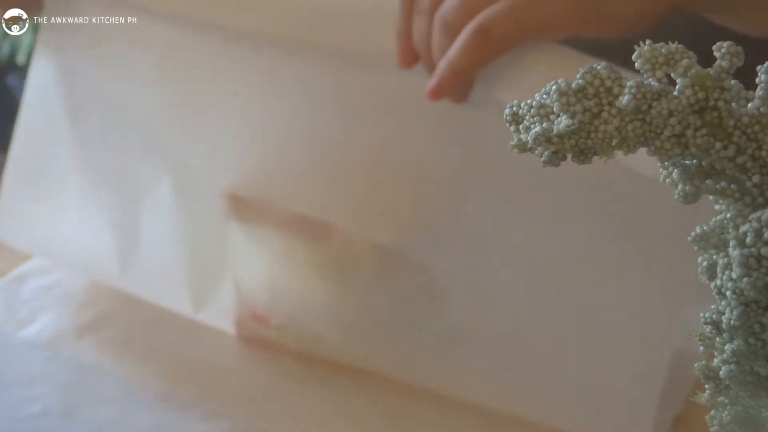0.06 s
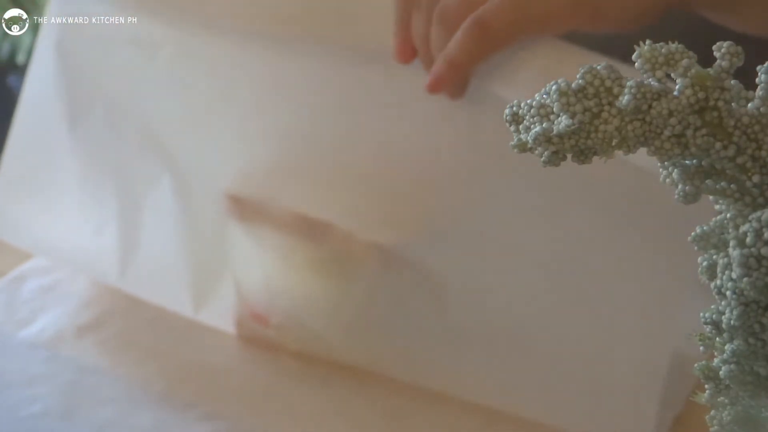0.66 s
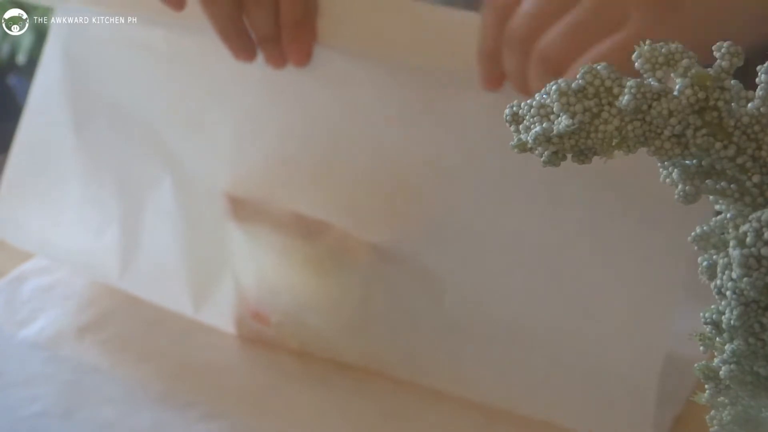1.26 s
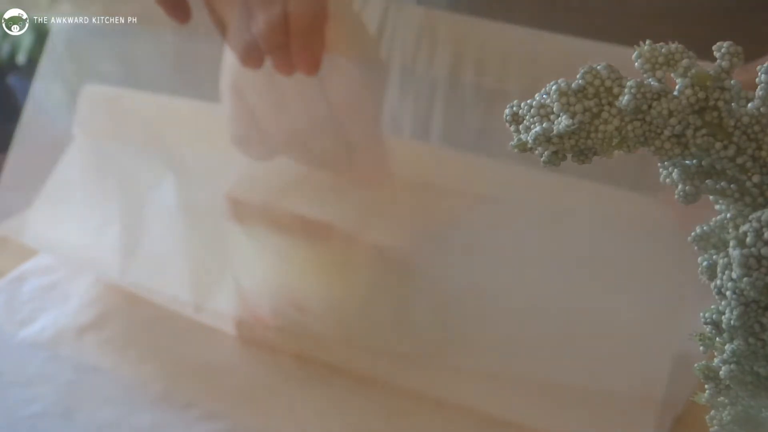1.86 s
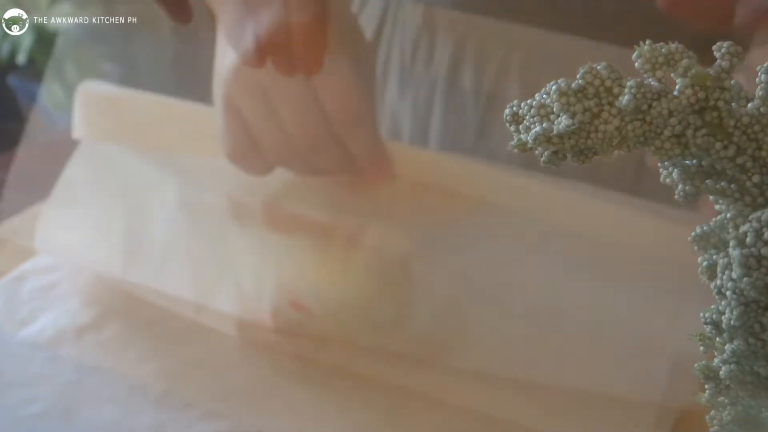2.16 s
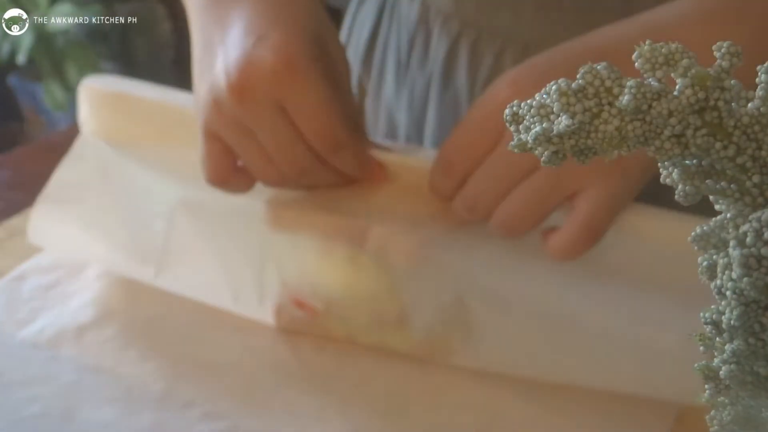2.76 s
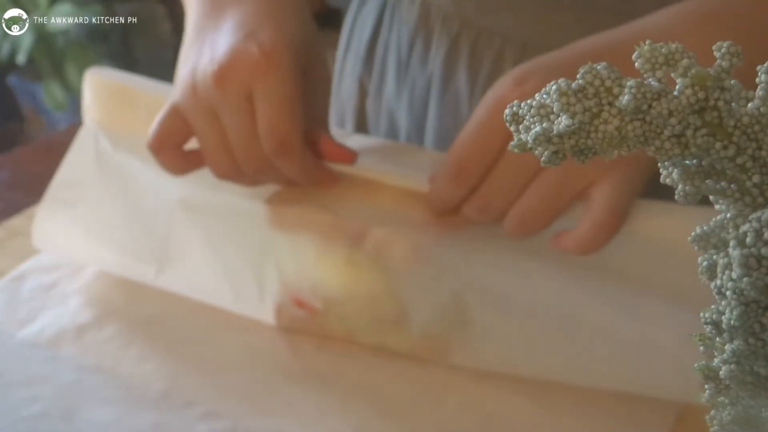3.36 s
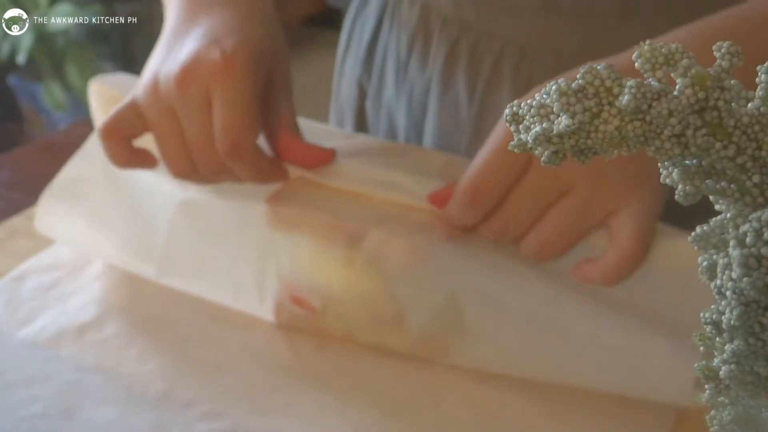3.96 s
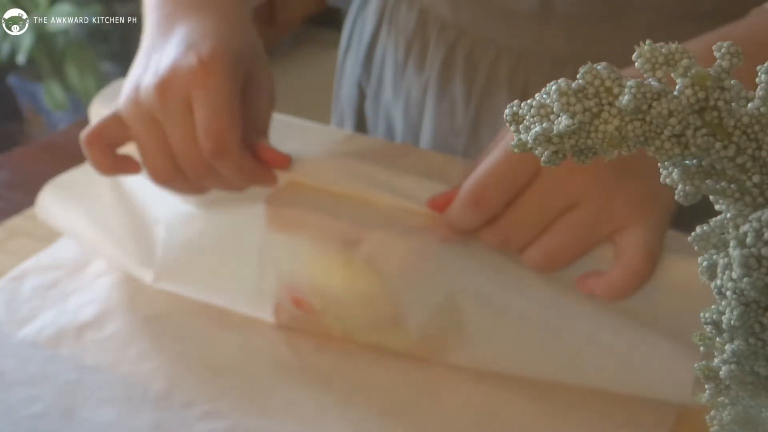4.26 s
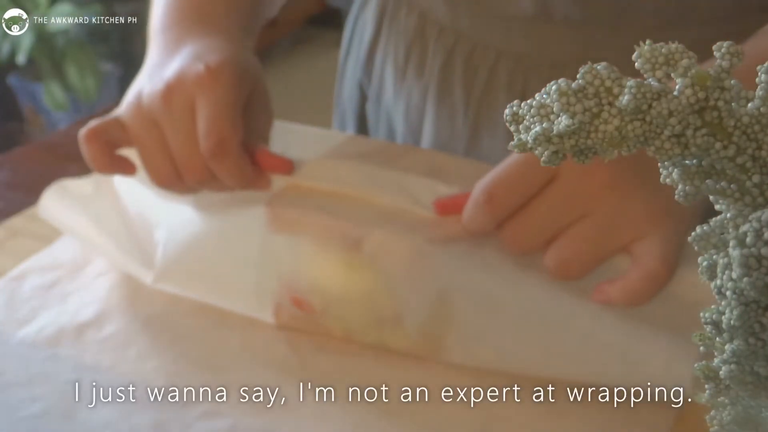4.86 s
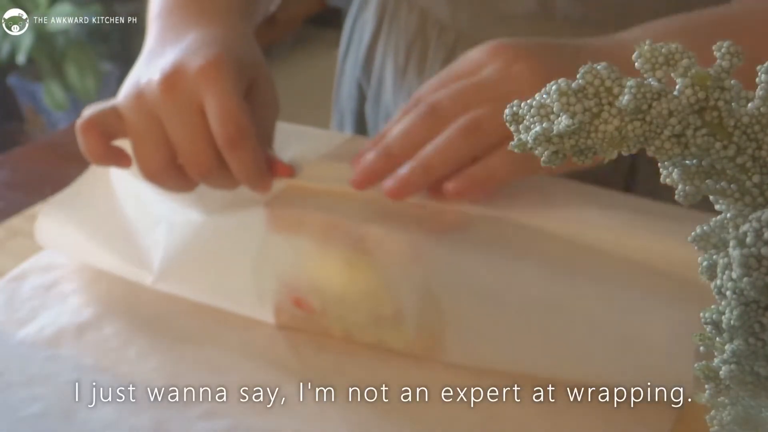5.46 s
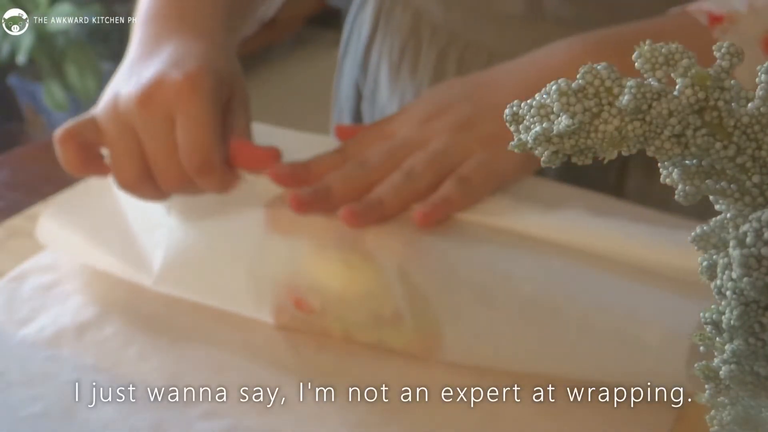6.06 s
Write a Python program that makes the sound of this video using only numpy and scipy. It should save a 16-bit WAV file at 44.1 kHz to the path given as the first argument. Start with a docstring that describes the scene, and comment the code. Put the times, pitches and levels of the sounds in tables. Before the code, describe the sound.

Close, crisp rustling and crackling of baking paper being creased over a parcel of food in short, uneven pushes.

```python
"""Small kitchen, microphone close to the table: thin baking paper is folded over food by hand.
The sheet is lifted and folded: each push of the fingers sets off a rustle of tiny buckles and sliding
paper, and larger facets snap through. After a lull just before 2 s the creasing goes on. Near 4 s the
hardest snaps come as the tucked fold bumps the parcel on the table; lighter touches lead to a last push
and bump at 6 s. Throughout, a hard surface nearby and the room throw the sound back over a faint hiss."""
import sys
import numpy as np
from scipy import signal
from scipy.fft import rfft, irfft
from scipy.io import wavfile
from scipy.ndimage import uniform_filter1d

SR = 44100
rng = np.random.default_rng(int(sys.argv[2]) if len(sys.argv) > 2 else 0)


def waveform_to_disk(signal):
    """Save audio, clipped to [-1, 1], as 16-bit WAV at the path in sys.argv[1]."""
    frames = np.transpose(np.atleast_2d(signal))
    scaled = np.clip(frames, -1, 1) * 32767
    samples = np.round(scaled).astype(np.int16)
    wavfile.write(sys.argv[1], SR, samples)


N = 270333

# facets snapping through:
# (time [s], relative energy [dB], die-away time [ms], tilt [dB/octave], facet pitch [Hz])
FACET_SNAPS = [(0.012, -39, 3.8, -5, 6800), (0.0836, -16, 0.73, 15, 6600), (0.0945, -14.5, 0.37, 9, 8700),
               (0.1251, -14, 1.2, -1, 8500), (0.3346, -25, 1.1, 9, 4720), (0.3912, -28, 1.8, 10, 3900),
               (0.4282, -19.5, 1.3, 3.5, 9400), (0.4472, -24, 2.1, 10, 4020), (0.7412, -59.5, 1, 1, 2930),
               (0.9394, -16.5, 1, 10, 6060), (1.057, -25, 0.6, 4, 7950), (1.0818, -15, 0.85, 15, 4660),
               (1.1537, -15, 2.8, 3, 6550), (1.1722, -14, 2.5, 1, 4870), (1.2091, -14, 4.1, 1, 4010),
               (1.25, -10, 2.2, 0, 8800), (1.2895, -16, 1.4, -2.5, 7350), (1.3386, -18.5, 1, -3.5, 8800),
               (1.367, -15, 0.57, 4, 6740), (1.401, -19, 1.5, 16, 6660), (1.444, -15, 2.5, 3, 2700),
               (1.624, -31, 0.73, 4.5, 4440), (1.625, -33.5, 1.6, 2.5, 1570), (1.6896, -41, 2.7, 2, 2840),
               (1.7581, -39, 1.3, 9, 6400), (1.7931, -41, 3.9, -0.5, 2270), (1.8123, -40, 1.2, 0.5, 2750),
               (2.267, -29, 2, 3.5, 2600), (2.2927, -13.5, 1.1, 2, 3100), (2.3213, -18.5, 1.7, 7, 5000),
               (2.4098, -18.5, 2.9, -6.5, 7650), (2.4105, -21, 4.7, 5, 1600), (2.4545, -12, 1.1, 1, 2300),
               (2.5384, -16.5, 1.5, 9, 3320), (2.5748, -20.5, 0.46, -2, 2750),
               (2.7039, -14.5, 2, 1.1, 2920), (2.733, -18.5, 0.29, 4, 5740),
               (2.892, -12.5, 0.92, 8.5, 3700), (2.9157, -23.5, 1.4, -1.5, 4120),
               (2.9869, -30, 1.8, 1, 3400), (3.0541, -28, 1.8, 0.5, 3080),
               (3.0713, -14.5, 0.26, 20.5, 5700), (3.1051, -18, 1.8, -2, 2300), (3.2509, -24, 1.8, 1, 3470),
               (3.3064, -24, 1.1, 6, 2890), (3.392, -30.5, .6, 3, 3130), (3.4425, -25, 0.93, 4.5, 2360),
               (3.4806, -13.5, 4.2, 2, 3600), (3.5598, -20, 0.47, 3.5, 8400), (3.6099, -24.5, 3.9, 0, 8550),
               (3.752, -31, 1.2, 3.5, 1860), (3.808, -20.5, 1, 10, 3960), (3.9584, -10, 3.3, -3.5, 4400),
               (4.033, -25, .6, -5.5, 5540), (4.0428, -9, 8.7, 0.5, 4700), (4.0449, -11.5, 2.2, -4, 3870),
               (4.2747, -24.5, 0.51, 6.5, 2270), (4.287, -26, 0.86, 2, 8200),
               (4.3013, -31.5, 1.2, 17.5, 1990), (4.4053, -15, 0.43, 15, 4000),
               (4.4186, -15.5, 0.47, 19, 8340), (4.4894, -14.5, 1.4, 11.5, 6800),
               (4.5286, -13.5, 3.6, -3, 8650), (4.548, -11.5, 0.4, 0, 8800),
               (4.7706, -24.5, 1.9, -0.5, 3850), (4.7906, -17, 0.53, 18, 7940),
               (4.8206, -24.5, 2.3, 9, 4140), (4.9119, -26.5, 0.95, 8, 3900), (5.0163, -15, 1.7, -1, 5390),
               (5.0704, -28.5, 0.97, -4, 7560), (5.132, -34, 0.54, -1.5, 5200),
               (5.2189, -23.5, 3.4, 5, 2980), (5.2579, -27.5, 3.6, -5, 2660),
               (5.3857, -39, 1.4, -4.5, 5650), (5.4496, -25, 4, -1, 2300), (5.6264, -29.5, 3, -7.5, 6400),
               (5.783, -46, 1.8, 0.5, 6120), (5.8472, -31, 1.6, 2, 2080), (5.879, -25.5, 3.3, -8, 1850),
               (6.0603, -10.5, 3.5, -1.5, 2560)]
# a gentle buckle flips one facet and rings at its pitch; a hard one flips many and is broad:
# (relative energy [dB], facet prominence [dB])
FACET_RING = [(-52, 35.5), (-14.5, 32.5), (-19, 19), (-10.5, 10)]
# pushes of the fingers:
# (start [s], rise [s], hold [s], relative level [dB], tilt [dB/octave], flexing of the sheet [dB])
FINGER_PUSHES = [(0.019, 0.044, 0.083, -39.5, -3, -8.5), (0.331, .008, .02, -51, 4.5, 11),
                 (0.395, 0.029, .02, -43, -0.5, -20), (0.889, 0.018, .05, -33.5, -4, -8),
                 (1.058, 0.02, .07, -38, -1.5, -11), (1.104, .08, 0.12, -29.5, -0.35, -7),
                 (1.28, 0.054, 0.1, -34.5, 5, 5), (1.414, 0.019, 0.053, -37.5, -5.5, -23),
                 (1.615, 0.018, 0.017, -58.5, -9.5, 0), (1.875, 0.046, 0.17, -81.5, -4, -6),
                 (2.125, .006, 0.031, -30.5, -1.54, -7), (2.254, .03, 0.067, -37, -6, -24.5),
                 (2.39, 0.039, 0.12, -34, -7.5, -14), (2.506, .04, 0.033, -34, -2.5, -3),
                 (2.607, 0.028, 0.038, -32, -2.5, -3), (2.706, .025, .03, -37, -0.5, -3),
                 (2.78, .02, 0.17, -45.5, -2, -18.5), (2.992, .015, .05, -38, 3, -1),
                 (3.043, 0.019, 0.11, -37, -2, -6), (3.18, 0.0067, .12, -51, -3.5, -19.5),
                 (3.329, .02, .08, -60.5, -7.5, -25), (3.435, 0.046, 0.14, -47, -0.5, -13),
                 (3.60, .02, 0.016, -38.5, -4, -18), (3.663, 0.046, 0.063, -47.5, -7, -5),
                 (3.73, 0.14, 0.063, -36, -2.5, -1), (3.947, 0.0057, 0.039, -30.5, 1.5, 9.5),
                 (4.006, 0.014, 0.11, -33.5, 1.5, 9.5), (4.186, 0.0073, .05, -52.5, -5.5, -9),
                 (4.269, .025, 0.057, -47.5, -6, -15), (4.385, 0.024, 0.043, -31, 1.5, 5.5),
                 (4.468, 0.018, 0.01, -27.5, -2.5, -6), (4.58, .025, 0.011, -42, -0.5, 2.5),
                 (4.677, 0.017, 0.019, -43.5, 1, -1), (4.777, 0.016, 0.08, -48, -8, -20),
                 (4.901, 0.032, 0.022, -57.5, -4, -5), (5.024, .006, 0.029, -50.5, 4, 10.5),
                 (5.176, 0.011, 0.033, -61.5, -13.5, -16), (5.237, 0.02, 0.0069, -45, 7, 4.5),
                 (5.405, 0.067, 0.021, -43, -7.5, -10), (5.499, 0.03, .02, -38.5, -4.5, -1.5),
                 (5.60, 0.0065, 0.018, -58, 19.5, 11.5), (5.67, .02, .09, -68, -13.5, 0),
                 (5.849, .012, 0.17, -49.5, 0, 3), (5.939, 0.056, .05, -37.5, -7.5, -7.5),
                 (6.021, 0.042, .07, -29.5, -1, 8)]
# colour of the rustle: (frequency [Hz], relative level [dB])
PAPER_SPECTRUM = [(18, -80.5), (30, -43.5), (96, -36), (187, -36), (284, -34), (338, -27.5), (422, -20),
                  (567, -18.5), (782, -11), (1160, -5.5), (2560, 0.5), (5930, -1.5), (8590, 2.5),
                  (10200, -2), (11000, -8.5), (14300, -31.5), (22000, -120)]
# the parcel bumping the table: (time [s], peak level [dB])
PARCEL_BUMPS = [(3.9573, -50), (4.045, -47.5), (6.062, -45.5)]
# dull ring of parcel and table: (frequency [Hz], relative level [dB], time to fall 60 dB [s])
TABLE_MODES = [(98, -14, .2), (253, -18, 0.098), (284.5, 9.5, 0.065), (427, 13.5, 0.11), (520, -5.5, 0.038)]
# early reflections at the microphone: (delay [ms], level [dB])
REFLECTIONS = [(1.2, -28), (7.2, -22), (8.0, -22), (8.9, -26.5), (14.3, -22.5)]
# kitchen reverberation: (frequency [Hz], time to fall 60 dB [s])
KITCHEN_DECAY = [(250, 0.38), (700, 0.35), (1800, 0.24), (4600, 0.2), (10000, 0.2)]
# colour of the quiet kitchen air: (frequency [Hz], relative level [dB])
AIR_SPECTRUM = [(20, -19), (60, -17.5), (200, -17.5), (400, 6.5), (1300, -12), (2100, -1.5), (5400, -10.5),
                (11000, -12)]

# a snap sets off smaller buckles around it, beginning just before it gives way
AVALANCHE_DB, AVALANCHE_LEAD_S = -11, 0.0085
# the whole band sounds up to the first edge, a faint sheen up to the second
EDGE_HZ, TOP_HZ = 11150, 15800


def snaps(level_db=-1.74, low_hz=1000, leak_db=-42, facet_width=0.062, shared_ring=0.31, crack=3.6):
    """A facet flips with a crack and a dying shiver, coloured by its ring; neighbours crackle along."""
    out, size = np.zeros(N), 2048
    hz, ms = np.fft.rfftfreq(size, 1 / SR), np.arange(size) / SR * 1000
    shivers = rng.standard_normal((len(FACET_SNAPS), size))
    # a small facet radiates little bass
    radiated_db = 10 * np.log10(hz ** 6 / (hz ** 6 + low_hz ** 6) + gain_of(leak_db) ** 2)
    for (s, db, die_ms, tilt, facet_hz), shiver in zip(FACET_SNAPS, shivers):
        burst = shiver * np.exp(-ms / die_ms)
        burst[0] += crack * np.sign(shiver[0])
        prominence = gain_of(np.interp(db, *np.transpose(FACET_RING)))
        detuning = (hz - facet_hz) / (facet_width * facet_hz)
        ring_db = 10 * np.log10(1 + prominence ** 2 / (1 + detuning ** 2))
        sheet_db = radiated_db + tilt * octaves(hz)
        snap = signal.fftconvolve(burst, minimum_phase(sheet_db + ring_db))[:size]
        neighbours = signal.fftconvolve(avalanche(), minimum_phase(sheet_db + shared_ring * ring_db))
        add(out, s, gain_of(db + level_db) * unit_energy(snap))
        add(out, s - AVALANCHE_LEAD_S, gain_of(db + AVALANCHE_DB) * unit_energy(neighbours))
    return out


def avalanche(build_s=0.0053, fade_s=0.011, spread_db=4, die_ms=0.4, count=24, size=2600):
    """A cluster of tiny buckles builds up to the snap and thins out after it."""
    onsets = rng.integers(0, size, count)
    since_snap = onsets / SR - AVALANCHE_LEAD_S
    sizes = np.exp(np.minimum(since_snap / build_s, -since_snap / fade_s))
    sizes *= gain_of(spread_db * rng.standard_normal(count))
    power = die_away(np.bincount(onsets, sizes ** 2, size), die_ms)
    return np.sqrt(power) * rng.standard_normal(size)


def rustle(level_db=3.0, patchy_db=3.5, flex_hz=1400):
    """Tiny buckles and sliding paper excite facets whose resonances shift as the sheet bends."""
    t = np.arange(0, N + 256, 128) / SR
    effort, tilt, flex_db = finger_pushes(t)
    effort = np.interp(np.arange(N) / SR, t, effort)
    hz, frames, spectra = signal.stft(buckle_and_slide(effort), SR, nperseg=512, noverlap=384)
    drift = uniform_filter1d(rng.standard_normal(spectra.T.shape), size=12, axis=0)
    facets = unit_rms(uniform_filter1d(drift, size=7, axis=1))
    # broad flexing of the sheet adds body under the crinkle
    body = 1 / (1 + (hz / flex_hz) ** 4)
    bend_db = np.outer(tilt, octaves(hz)) + np.outer(flex_db, body)
    colour = gain_of(curve_at(PAPER_SPECTRUM, hz) + bend_db[:len(frames)] + patchy_db * facets)
    colour /= np.sqrt(np.mean(colour ** 2, axis=1, keepdims=True))
    crinkle = signal.istft(spectra * colour.T, SR, nperseg=512, noverlap=384)[1][:N]
    return unit_rms(crinkle) * gain_of(level_db) * effort


def finger_pushes(t, sag_db_per_s=38, settle_db_per_s=337.5):
    """Each push swells, sags while the fingers press and dies as the sheet settles."""
    start, rise, hold, db, tilt, flex_db = np.transpose(FINGER_PUSHES)[:, :, None]
    swell = np.clip((t - start) / rise, 0, 1) ** 2
    held = np.maximum(t - start - rise, 0)
    fall_db = sag_db_per_s * held + settle_db_per_s * np.maximum(held - hold, 0)
    power = (swell * gain_of(db - fall_db)) ** 2 + 1e-20
    share = power / power.sum(0)  # overlapping pushes share the colour by power
    return np.sqrt(power.sum(0)), (share * tilt).sum(0), (share * flex_db).sum(0)


def buckle_and_slide(effort, buckles_per_s=1300, full_push_db=-32, spread_db=4, slide_db=-5, clump_db=1.9):
    """Clumps of tiny buckles over the hiss of sliding paper; a light touch gives fewer of them."""
    busy = np.clip(effort / gain_of(full_push_db), .03, 1) ** .45
    sizes = gain_of(spread_db * np.minimum(rng.exponential(1, N), 4))
    sizes *= rng.random(N) < busy * buckles_per_s / SR
    power = die_away(sizes ** 2 / busy, die_ms=0.98)
    crackle = np.sqrt(power / power.mean() + gain_of(slide_db) ** 2) * rng.standard_normal(N)
    clumps = uniform_filter1d(uniform_filter1d(rng.standard_normal(N), size=400), size=300)
    return crackle * gain_of(clump_db * unit_rms(clumps))


def bumps(attack_s=0.006):
    """Parcel and table give a soft low knock as the wrapped food is pressed down."""
    out, t = np.zeros(N), np.arange(SR // 4) / SR
    ring = sum(gain_of(db - 60 * t / t60) * np.sin(2 * np.pi * hz * t) for hz, db, t60 in TABLE_MODES)
    ring *= np.minimum(t / attack_s, 1)
    for s, db in PARCEL_BUMPS:
        add(out, s, gain_of(db) * ring / abs(ring).max())
    return out


def kitchen(direct, tail_db=-4.5, side_db=-7.5, first_ms=5.5, wander_hz=4, wide_hz=400, spots=6):
    """Direct sound, early reflections and a short tail that changes as the sound wanders over the sheet."""
    t = np.arange(SR // 2) / SR
    taps = rng.standard_normal((spots, 2, len(t))) * (t > first_ms / 1000)
    hz, when, spectra = signal.stft(taps, SR, nperseg=256)
    decay = gain_of(-60 * when / curve_at(KITCHEN_DECAY, hz)[:, None])
    tails = signal.istft(spectra * decay, SR, nperseg=256)[1]
    tails *= gain_of(tail_db) / np.linalg.norm(tails[0, 0])
    # each spot on the sheet feeds its own tail in turn
    turns = wander_hz * np.arange(N) / SR - np.arange(spots)[:, None] / spots
    nearness = np.maximum(np.cos(2 * np.pi * turns), 0)
    nearness /= np.linalg.norm(nearness, axis=0)
    mid, side = signal.fftconvolve((direct * nearness)[:, None], tails, axes=2).sum(0)[:, :N]
    for k, (ms, db) in enumerate(REFLECTIONS):
        add(mid, ms / 1000, gain_of(db) * direct)
        add(side, ms / 1000, (-1) ** k * gain_of(db) * direct)
    # the bass reaches both sides alike
    side = signal.lfilter(*signal.butter(1, wide_hz, "high", fs=SR), side)
    return direct + mid + gain_of(side_db) * np.array([side, -side])


def room_tone(level_db=-91):
    """Faint steady hiss of the kitchen air."""
    colour = gain_of(curve_at(AIR_SPECTRUM, np.fft.rfftfreq(N, 1 / SR)))
    return gain_of(level_db) * unit_rms(irfft(rfft(rng.standard_normal(N)) * colour, N))


def gain_of(db):
    """Decibels to amplitude."""
    return 10 ** (np.asarray(db) / 20)


def unit_rms(x):
    """Scales to rms 1."""
    return x / np.sqrt(np.mean(x ** 2) + 1e-20)


def unit_energy(x):
    """Scales to the energy of rms 1 held for 1 ms, counted below EDGE_HZ."""
    power = abs(rfft(x)[np.fft.rfftfreq(len(x), 1 / SR) < EDGE_HZ]) ** 2
    return x / np.sqrt(2 * power.sum() / len(x) * 1000 / SR + 1e-20)


def die_away(power, die_ms):
    """Gives each pulse of power a tail whose amplitude falls to 1/e in die_ms."""
    return signal.lfilter([1], [1, -np.exp(-2000 / (die_ms * SR))], power)


def curve_at(points, hz):
    """Reads a table on a log-frequency axis."""
    f, value = np.transpose(points)
    return np.interp(np.log(hz + 1), np.log(f + 1), value)


def octaves(hz):
    """Octaves from the middle of the paper's range; tilt stops acting in the bass."""
    return np.log2(np.maximum(hz, 1100) / 4000)


def minimum_phase(db):
    """Causal impulse response of a dB spectrum."""
    cepstrum = irfft(np.log(gain_of(np.maximum(db, -100))))
    half = len(cepstrum) // 2
    cepstrum[1:half] *= 2
    cepstrum[half + 1:] = 0
    return irfft(np.exp(rfft(cepstrum)))


def add(mix, s, sound):
    """Mixes a sound in at s seconds."""
    part = mix[max(round(s * SR), 0):][:len(sound)]
    part += sound[:len(part)]


def scene():
    """Paper, table and room tone, in stereo from close by."""
    return kitchen(snaps() + rustle() + bumps() + room_tone())


def record(dry, sheen_db=-43):
    """The recorder's steep band limit, with a faint sheen above it."""
    band, top = (signal.firwin(255, hz, window=("kaiser", 9), fs=SR) for hz in (EDGE_HZ, TOP_HZ))
    return signal.oaconvolve(dry, (band + gain_of(sheen_db) * top)[None], "same")


dry = scene()
out = record(dry)
waveform_to_disk(out)
```